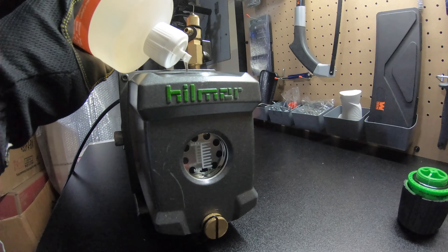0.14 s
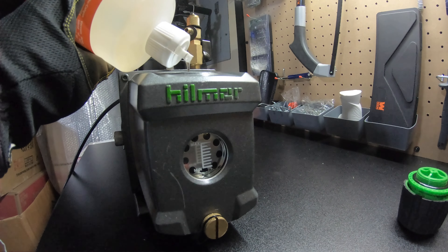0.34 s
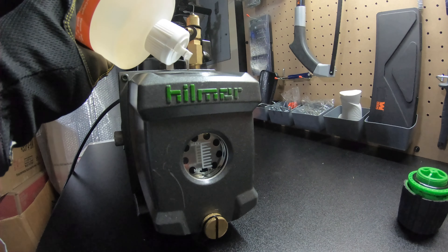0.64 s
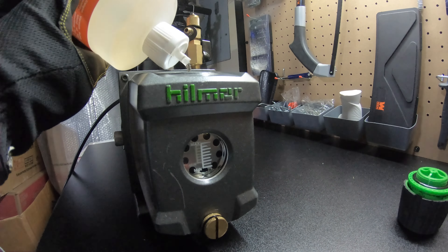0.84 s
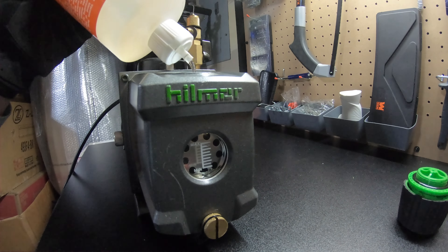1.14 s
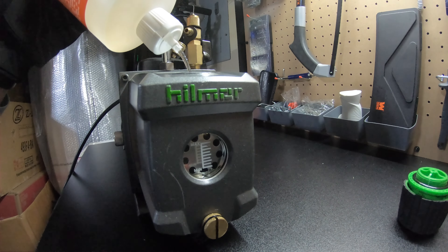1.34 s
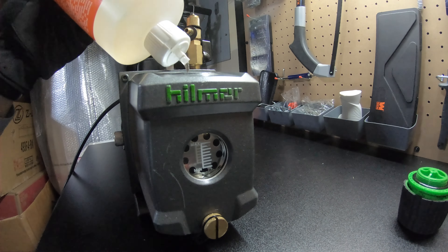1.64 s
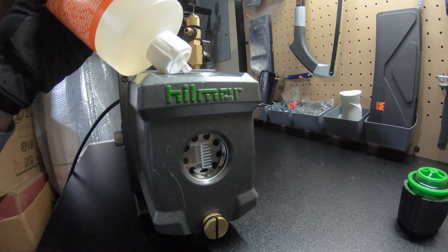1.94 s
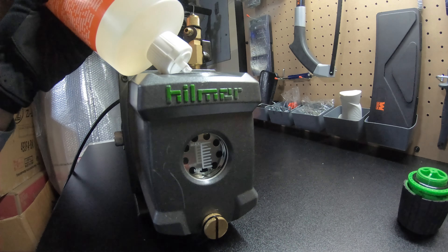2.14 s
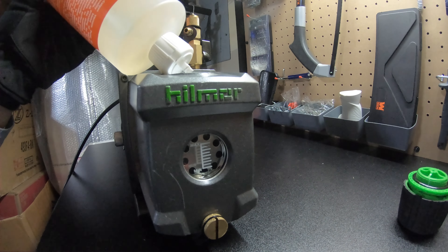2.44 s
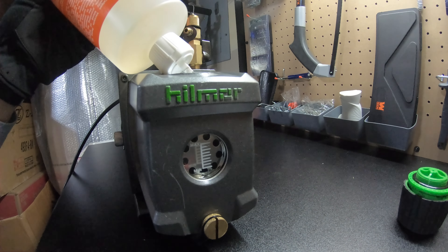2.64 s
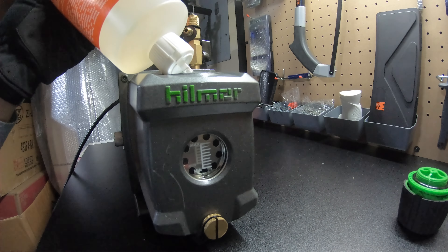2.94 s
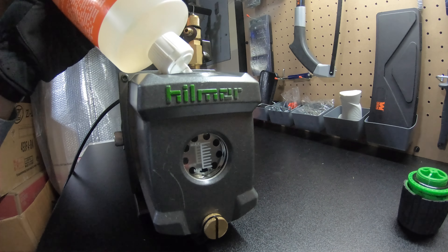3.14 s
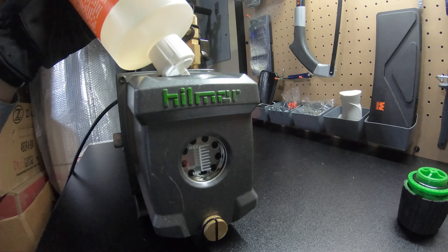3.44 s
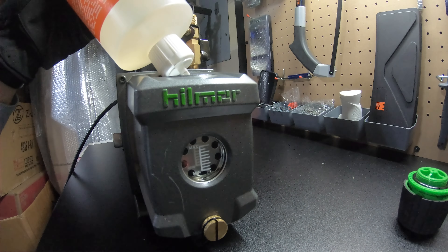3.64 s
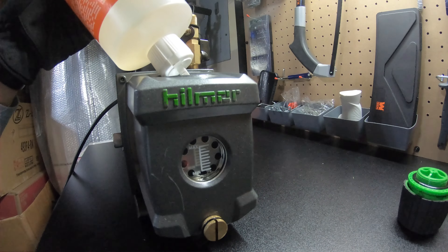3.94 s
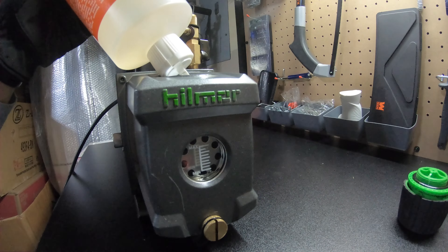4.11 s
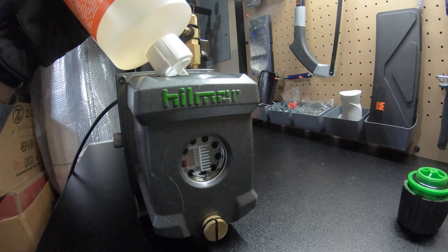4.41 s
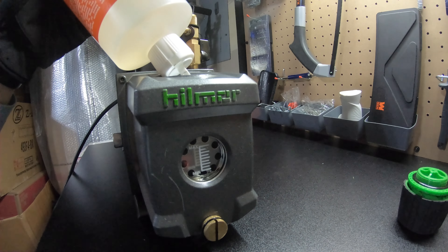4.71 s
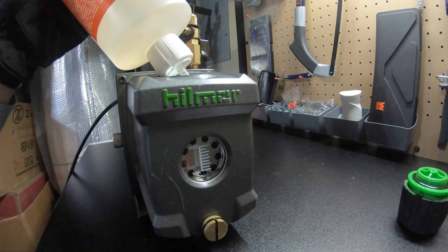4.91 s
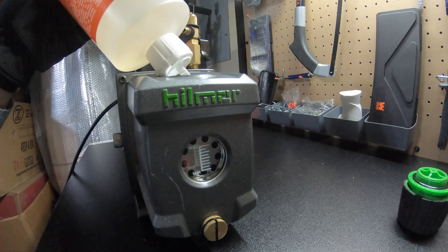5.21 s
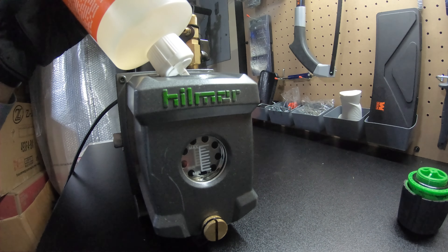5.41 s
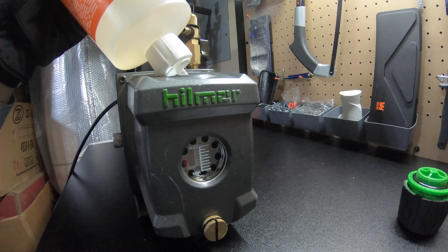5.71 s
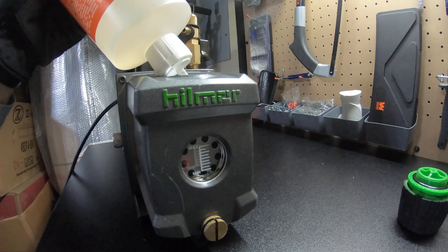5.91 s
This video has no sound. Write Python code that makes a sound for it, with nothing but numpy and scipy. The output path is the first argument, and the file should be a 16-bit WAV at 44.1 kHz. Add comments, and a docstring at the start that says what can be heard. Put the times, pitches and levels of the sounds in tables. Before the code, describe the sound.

For the first 0.7 seconds there is only low mains hum and room rumble, with a faint bright rustle fading by 0.2. At 0.7 the hum abruptly gives way to a steady, slightly buzzy electric whine, fairly low to middling in pitch, with unevenly flickering hiss. A tiny hiss at the spout leads to the loudest glug at 1.0: a deep, hollow double gulp with a plastic knock and a short reservoir ring. Another strong glug follows at 1.7. Smaller, crackling clusters come at 2.4, 3.25, 4.0, 4.6 and 5.15, with sharp little pops in several. Soft plops, faint burbles and slight bottle thumps sit between. A faint low tone sinks from 1.3 to 3.9; a thin, breathy whistle wavers and mostly sinks from 2.7 to 5.8. After the last glug, small burbles and whine continue to about 6. Close, wide stereo, a short dull workshop reflection.

```python
"""Oil glugs from a plastic bottle into a pump reservoir on a workbench, heard at two close ports.
About every 0.7 s air breaks in through the spout: trains of gulps ring damped modes of belly and neck.
The oil film crackles as shaped noise; pops, plops, thumps, a wall knock and the hollow are damped modes too.
Two faint tones mostly sink during the pour. Behind lies a mains hum, then a harmonic whine and filtered hiss."""
import sys
import numpy as np
from scipy import signal
from scipy.fft import rfft, irfft, next_fast_len
from scipy.io import wavfile
from scipy.ndimage import uniform_filter1d

SR = 44100
rng = np.random.default_rng(int(sys.argv[2]) if len(sys.argv) > 2 else 0)


def file_out(sig):
    """Save sig as 16-bit WAV at sys.argv[1]."""
    # one column per channel
    cols = np.atleast_2d(sig).T
    # limit, then scale
    lim = np.clip(cols, -1, 1)
    pcm = np.round(lim * 32767).astype(np.int16)
    wavfile.write(sys.argv[1], SR, pcm)


N = 267246
T = np.arange(N) / SR  # time axis, s

# whistle track, shared by its core and its hiss: start_s, pitch_hz, level_db
WHISTLE_TRACK = [(2.65, 2600, -85), (2.94, 2560, -65.5), (3.05, 2523, -80), (3.65, 2410, -67.5),
                 (4.15, 2338, -69), (4.26, 2376, -54), (4.35, 2360, -63), (4.46, 2370, -69),
                 (4.57, 2340, -56.5), (4.69, 2333, -68.5), (4.79, 2328, -58.5), (4.86, 2320, -68),
                 (4.93, 2310, -62.5), (5.1, 2323, -71), (5.22, 2330, -58.5), (5.37, 2310, -67.5),
                 (5.7, 2290, -68.5), (5.85, 2290, -83)]


def undb(db):
    """Amplitude ratio: 20 dB is a factor of ten."""
    return 10 ** (np.asarray(db) / 20)


def add(out, start_s, sound):
    """Superposition: mix a sound in at its start time."""
    i = max(int(start_s * SR), 0)
    n = min(sound.shape[-1], N - i)
    out[..., i:i + n] += sound[..., :n]


def walk(rate_hz):
    """Slow random modulation of unit deviation: held random levels smoothed by two moving averages."""
    hold = int(SR / rate_hz)
    steps = np.repeat(rng.standard_normal(N // hold + 1), hold)
    smooth = uniform_filter1d(uniform_filter1d(steps, hold), hold)[:N]
    return smooth / smooth.std()


def colour(x, hz, db):
    """Linear filtering by a magnitude response drawn on a log-frequency axis."""
    size = next_fast_len(N + 4096)
    f = np.maximum(np.fft.rfftfreq(size, 1 / SR), 1)
    response = undb(np.interp(np.log(f), np.log(hz), db))
    return irfft(rfft(x, size) * response, size)[..., :N]


def ports(z, pan_db, phase_rad):
    """Interport level and phase difference: an analytic sound reaches the nearer port in full."""
    left = undb(np.minimum(pan_db, 0)) * z.real
    right = undb(np.minimum(-pan_db, 0)) * (z * np.exp(1j * phase_rad)).real
    return np.array([left, right])


def ring(modes, hz, rise_s, length=1, glide=0, scatter=0.019):
    """Modal decay, peak 1: a soft push excites damped modes; a closing bubble's pitch glides up."""
    glide_s = 0.0059  # the glide passes through the main pitch at this age
    t = T[:SR // 4]
    ratio, db, t60 = np.transpose(modes)[:, :, None]
    f = hz * ratio * (1 + scatter * rng.standard_normal(ratio.shape))
    age = t / length  # a longer push stretches rise, glide and decay
    clock = np.cumsum(1 + glide * np.tanh(age / glide_s - 1)) / SR
    decay = undb(db - 60 * age / t60)
    z = np.sum(decay * np.exp(2j * np.pi * f * clock), axis=0)
    z = z * (1 - np.exp(-(age / rise_s) ** 2))
    return z / abs(z).max()


def bottle(low_cut_hz=60, neck_lead_s=0.0018):
    """Cavity resonance: each gulp or burble rings the air in belly and neck, the neck speaking first."""
    # modes of the air in the belly and in the neck: pitch_ratio, level_db, t60_s
    belly_modes = [(.33, -21, 0.095), (.64, -17.5, 0.059), (1, 5.5, 0.054), (1.24, -3, 0.039),
                   (1.42, -21.5, 0.014), (2.0, -10.5, 0.034)]
    neck_modes = [(.44, -18, .04), (.565, -9, .06), (.67, -20, 0.076), (.89, -9.5, 0.089), (1, 12.5, 0.023),
                  (1.045, -19.5, 0.034), (1.42, -16.5, 0.028)]
    # belly at the ports: left_minus_right_db, right_phase_rad
    belly_ports = (6.5, 2.37)
    # the neck sounds further right as the spout is lowered: start_s, left_minus_right_db
    neck_pan = [(1.1, -9), (1.7, -17), (2.4, -17.5)]
    # gulps of air, in trains during a glug and singly between:
    # start_s, belly_hz, belly_db, neck_hz, neck_db, relative_length
    gulps = [(0.918, 268, -42.5, 880, -35, 1.2), (0.936, 265, -33.5, 844, -38.5, 1.3),
             (0.999, 282, -21, 846, -11, 0.85), (1.004, 276, -10.5, 854, -18.5, 0.82),
             (1.014, 236, -27.5, 837, -36, 0.99), (1.02, 249, -34, 846, -18.5, 0.75),
             (1.028, 249, -34, 820, -28.5, 0.75), (1.073, 259, -41, 860, -36, 1.4),
             (1.091, 300, -46, 850, -52, 0.79), (1.106, 298, -31, 830, -34.5, 1),
             (1.454, 324, -37, 890, -56, 0.81), (1.475, 260, -44, 870, -64, 1),
             (1.582, 267, -50, 870, -55, 0.91), (1.709, 274.8, -15, 839, -12, 1.18),
             (1.714, 258, -28, 845, -15.5, 0.92), (1.722, 263, -20, 833, -24, 1.3),
             (1.741, 273, -32, 824, -21.5, 1.3), (1.76, 266.6, -44, 844, -23.5, 0.94),
             (1.772, 263, -30, 820, -35, 1.4), (1.784, 269, -26.5, 812, -22, 0.95),
             (1.841, 292, -35, 834, -23, 1), (1.939, 274, -45, 840, -41.5, 1.2),
             (2.238, 268, -44, 880, -66, 1), (2.271, 270, -39.5, 816, -53, 0.82),
             (2.404, 339, -23.5, 797, -32, 1.1), (2.412, 347, -29, 797, -27, 1),
             (2.423, 318, -24.5, 834, -36, 0.85), (2.43, 315, -38, 830, -29.5, .7),
             (2.451, 296, -30, 797, -31, 1.14), (2.467, 290, -44, 830, -43, .8),
             (2.472, 280, -36, 860, -50, 0.94), (2.481, 293, -35, 860, -52, 0.67),
             (2.882, 335, -48, 784, -42, 1), (3.147, 270, -42, 850, -58, 0.73),
             (3.246, 319, -22.5, 862, -26, 1.35), (3.259, 310, -35, 850, -41, 0.56),
             (3.268, 278, -21, 840, -39, 1), (3.278, 275, -20, 830, -32, .8),
             (3.297, 277, -33, 840, -40, 0.81), (3.304, 282, -53, 850, -40, 0.57),
             (3.321, 286, -26, 830, -40, 1.2), (3.379, 262, -39, 810, -51, 1),
             (3.988, 299, -27, 810, -26, .9), (3.995, 320, -23, 831, -16.5, 1.16),
             (4.007, 286, -25, 814, -21, 1.13), (4.018, 271, -21.5, 845, -36, 1.26),
             (4.038, 266, -24.5, 830, -35, 1.22), (4.071, 292, -49, 840, -56, 0.57),
             (4.155, 287, -36, 870, -50, 0.8), (4.175, 247, -47, 870, -55, 0.75),
             (4.283, 305, -39.5, 860, -58, 1.1), (4.495, 278, -42, 880, -63, 1.05),
             (4.587, 350, -22, 796, -25, 0.8), (4.594, 351, -25, 825, -20.5, 1.05),
             (4.599, 351, -26, 837, -36, 1.16), (4.61, 296, -24, 790, -32, 1.25),
             (4.628, 267, -28.5, 873, -35, 1), (4.644, 280, -27, 836, -35.5, .8),
             (4.672, 286, -36, 810, -47, 0.94), (4.716, 300, -41, 860, -60, 1.1),
             (4.74, 249, -45, 860, -63, 1.06), (4.766, 276.5, -40, 850, -58, 0.72),
             (4.79, 335, -44, 870, -47, 0.85), (4.962, 288, -43, 838, -65, 1.2),
             (5.036, 298, -29, 850, -34, 1.12), (5.157, 334, -23, 830, -24.5, 1.1),
             (5.162, 326, -38, 845, -20.5, 0.74), (5.171, 300, -27, 875, -28, 1.1),
             (5.182, 267, -25, 888, -27.5, 0.97), (5.19, 260, -37, 860, -45, 1.1),
             (5.198, 259, -38, 850, -35, 0.84), (5.222, 277, -27.5, 794, -38.5, 1.1),
             (5.244, 282, -36, 800, -61, 1.2), (5.295, 300, -38, 854, -58, 1),
             (5.366, 277, -38.5, 880, -66, 0.94), (5.59, 284, -37, 786, -36, 0.99),
             (5.716, 255, -45, 860, -71, 1.3)]
    belly, neck = np.zeros((2, N), complex)
    for start_s, belly_hz, belly_db, neck_hz, neck_db, length in list(gulps) + burbles():
        belly_ring = ring(belly_modes, belly_hz, rise_s=0.0029, length=length, glide=0.0064, scatter=0.014)
        neck_ring = ring(neck_modes, neck_hz, rise_s=0.0045, length=length, glide=0.033, scatter=0.017)
        add(belly, start_s, undb(belly_db) * belly_ring)
        add(neck, start_s - neck_lead_s, undb(neck_db) * neck_ring)
    neck_pan_db = np.interp(T, *np.transpose(neck_pan))
    sound = ports(belly, *belly_ports) + ports(neck, neck_pan_db, phase_rad=-1.61)
    return signal.sosfilt(signal.butter(2, low_cut_hz, "high", fs=SR, output="sos"), sound)


def burbles(db=-50, spread_db=5.5, neck_db=-54, start_s=1.2, belly_hz=270, neck_hz=830, count=90):
    """Random arrivals: small burbles of chance size and level, in the same columns as the gulps."""
    when = rng.uniform(start_s, N / SR, count)
    chance = rng.standard_normal((count, 3))
    return [(s, belly_hz * np.exp(0.3 * size), db + spread_db * a,
             neck_hz * np.exp(0.2 * size), neck_db + spread_db * b, 1)
            for s, (a, size, b) in zip(when, chance)]


def film(grain_db=4, tail_db=-24, tail_s=0.014):
    """Shot noise: the tearing oil film sprays tiny clicks, a mid spit and a bright fizz with short tails."""
    # tears as a glug opens, crackles and snaps shut: start_s, spit_db, fizz_db, decay_s
    tears = [(.998, -46.5, -62, 0.01), (1.706, -40.5, -61, 0.0069), (1.7385, -39, -45.5, 0.0037),
             (1.793, -45, -47, 0.0031), (2.4013, -35, -38.5, 0.0065), (2.412, -40, -61, .002),
             (2.423, -41, -44.5, 0.0041), (2.451, -51, -68, .004), (3.2429, -40, -37, 0.0074),
             (3.25, -35, -58, 0.01), (3.257, -39, -45, 0.0027), (3.2665, -50, -54, 0.0031),
             (3.279, -55, -60, 0.0048), (3.2957, -46.5, -70, .004), (3.317, -50, -70, 0.0059),
             (3.986, -37, -35.5, 0.0034), (3.9895, -34.5, -49, 0.0087), (4.0068, -46, -37, 0.0025),
             (4.016, -43, -65, 0.0036), (4.038, -48.5, -74, 0.0053), (4.585, -37.5, -37.5, 0.0073),
             (4.593, -34.5, -50, 0.004), (4.598, -40, -45.5, 0.0034), (4.607, -45, -61, .003),
             (4.617, -45.5, -55, 0.006), (4.639, -50, -74, .003), (4.888, -66, -61, 0.0021),
             (4.985, -55, -62, 0.0029), (5.154, -41, -37.5, 0.005), (5.1554, -36, -45, 0.01),
             (5.169, -34, -56, 0.0043), (5.177, -38, -37.5, 0.0013), (5.183, -54, -51, .002),
             (5.195, -40, -40, 0.0027), (5.223, -53, -75, 0.0052)]
    # relative spectra of spit and fizz: frequency_hz, level_db
    spit_colour = [(600, -11), (1300, 5), (2000, -5.5), (2900, -5), (3600, 0.5), (4400, -12.5),
                   (5200, -5.5), (7000, -21.5), (12000, -65)]
    fizz_colour = [(3000, -5.5), (6000, -11.5), (7600, 1), (8700, -4.5), (9800, 3.5), (11000, 3.5),
                   (12000, -1), (12600, -1), (13800, -6), (15500, -5), (17000, -19)]
    t = T[:SR // 6]
    power = np.zeros((2, N))
    for start_s, spit_db, fizz_db, decay_s in tears:
        decay = np.exp(-t / decay_s) + undb(tail_db) * np.exp(-t / tail_s)
        shape = decay * (1 - np.exp(-t / 0.00026))
        add(power, start_s, (undb([[spit_db], [fizz_db]]) * shape) ** 2)
    out = 0
    for part_power, spectrum, pan_db in zip(power, (spit_colour, fizz_colour), (-5, 4.5)):
        # noise partly common to both ports, its level redrawn every 24 samples
        grains = undb(grain_db * np.repeat(rng.standard_normal(N // 24 + 1), 24)[:N])
        clicks = (rng.standard_normal((2, N)) + 0.76 * rng.standard_normal(N)) * grains
        scale = 1 / colour(clicks, *np.transpose(spectrum)).std()
        crackle = scale * colour(clicks * np.sqrt(part_power), *np.transpose(spectrum))
        out = out + crackle * undb([[min(pan_db, 0)], [min(-pan_db, 0)]])
    return out


def pops():
    """Bubble resonance: tiny bubbles burst at the spout with short pitched ticks."""
    # bursts: start_s, pitch_hz, level_db, left_minus_right_db
    bursts = [(1.7437, 2620, -47, 0), (1.941, 3560, -51, 5), (2.429, 3520, -36.5, -5),
              (4.007, 12130, -24, 3), (4.5902, 3800, -27.5, -12), (4.62, 3430, -34, -6),
              (5.173, 4000, -37, -14)]
    # modes of a burst: pitch_ratio, level_db, t60_s
    pop_modes = [(.73, -7, 0.0017), (.89, -4, 0.0092), (1, 6, 0.014), (1.124, -7, .007), (1.25, -7, 0.0042)]
    out = np.zeros((2, N))
    for start_s, hz, db, pan_db in bursts:
        tick = undb(db) * ring(pop_modes, hz, rise_s=0.00032)
        add(out, start_s, ports(tick, pan_db, phase_rad=-1.37))
    return out


def seep(centre_s=0.92, width_s=0.021, db=-48.0):
    """Turbulence noise: air hisses past the spout just before the first glug."""
    hz = [300, 900, 2800, 3700, 4400, 7000, 10000, 16000]
    hiss = colour(rng.standard_normal((2, N)), hz, [-15, 9.0, -3.0, -1.5, -3.0, -7.0, -34.0, -5])
    return undb(db) * hiss / hiss.std() * np.exp(-((T - centre_s) / width_s) ** 2)


def wall():
    """Plate modes: the sucked-in plastic wall knocks as the first air relieves it."""
    # the wall flexing back: start_s, level_db
    flexes = [(0.998, -24.5), (1.007, -27), (1.016, -42)]
    # modes of the wall: pitch_ratio, level_db, t60_s
    wall_modes = [(.62, 9, 0.016), (.9, -7.5, 0.03), (1, -2.5, 0.061), (1.23, -3.5, 0.028), (1.38, -5, .02),
                  (1.88, -19, 0.019), (2.39, -15, 0.027)]
    z = np.zeros(N, complex)
    for start_s, db in flexes:
        add(z, start_s, undb(db) * ring(wall_modes, hz=1940, rise_s=0.00049))
    return ports(z, pan_db=-6.5, phase_rad=-1.24)


def thumps():
    """Low-mode vibration: the flexing, filled bottle thumps softly in two slow modes."""
    # thumps: start_s, level_db
    knocks = [(3.303, -46), (4.26, -51.5), (4.609, -46), (5.032, -43), (5.203, -44)]
    z = np.zeros(N, complex)
    for start_s, db in knocks:
        add(z, start_s, undb(db) * ring([(1, -0.78, 0.29), (1.6, -1.7, 0.22)], hz=92, rise_s=0.0039))
    return ports(z, pan_db=-10.5, phase_rad=0.41)


def plops():
    """Bubble closure: oil lands in the reservoir with soft, short, rising plops."""
    # landings: start_s, pitch_hz, level_db
    landings = [(.934, 599, -39), (1.452, 560, -42.5), (1.797, 547, -34), (1.845, 563, -39),
                (1.893, 531, -41.5), (2.48, 514, -43), (2.896, 540, -39), (3.592, 540, -45),
                (4.288, 603, -41), (4.393, 534, -46), (4.789, 487, -33), (5.035, 512, -40),
                (5.21, 528, -57), (5.286, 489, -40)]
    # modes of a plop: pitch_ratio, level_db, t60_s
    plop_modes = [(.65, -8.5, .03), (1, 2, .04), (1.3, -6, .025)]
    # plops at the ports: left_minus_right_db, right_phase_rad
    plop_ports = (-2, -2)
    z = np.zeros(N, complex)
    for start_s, hz, db in landings:
        add(z, start_s, undb(db) * ring(plop_modes, hz, rise_s=0.0013, glide=0.14))
    return ports(z, *plop_ports)


def hollow(hz=558.558, t60=0.19, rise_s=0.0085):
    """Cavity resonance: the reservoir's air rings on after strong glugs, roughened by the moving oil."""
    # excitations: start_s, level_db
    glugs = [(1.001, -16.5), (1.71, -31), (3.996, -37), (4.592, -35)]
    z = np.zeros(N, complex)
    for start_s, db in glugs:
        add(z, start_s, undb(db) * ring([(1, 0, t60)], hz, rise_s=rise_s, scatter=0))
    wobble = 1 + 0.22 * (walk(110) + 1j * walk(110))
    return ports(z * wobble, pan_db=-1.3, phase_rad=-2.44)


def workshop(x, wet_db=-15, t60=0.18):
    """Reverberation by convolution: bench and tool wall throw back a short, dull wash."""
    t = T[:SR // 3]
    echo = rng.standard_normal((2, len(t))) * undb(-60 * t / t60) * (t > 0.004)
    echo = echo / np.sqrt(np.sum(echo ** 2, axis=1, keepdims=True))
    echo = signal.lfilter(*signal.butter(1, 3000, fs=SR), echo)
    return x + undb(wet_db) * signal.fftconvolve(x, echo, axes=1)[:, :N]


def sinking_tone(track, flutter_db, width_hz, rough):
    """Narrow-band modulation: a gliding tone wavers at a rate that sets its bandwidth."""
    start_s, hz, db = np.transpose(track)
    waver = 1 + rough * (walk(width_hz) + 1j * walk(width_hz))
    waver = waver / np.sqrt(1 + 2 * rough ** 2)
    gain = undb(np.interp(T, start_s, db, left=-120, right=-120) + flutter_db * walk(14))
    turn = 2 * np.pi * np.cumsum(np.interp(T, start_s, hz)) / SR
    return gain * (waver * np.exp(1j * turn)).real


def low_tone():
    """Frequency glide: a faint low tone sinks while the oil runs."""
    # the tone's course: start_s, pitch_hz, level_db
    track = [(1.3, 615, -73), (1.58, 611, -56.5), (1.9, 605, -55), (2.2, 603, -70), (2.5, 598, -56.5),
             (2.75, 578.5, -61), (3.0, 545, -56.5), (3.1, 535, -63), (3.3, 533, -60.5), (3.7, 530, -53.5),
             (3.87, 515, -64)]
    return sinking_tone(track, flutter_db=2.5, width_hz=22, rough=0.3)


def whistle(hiss_db=-6):
    """Tone in noise: a thin, mostly sinking whistle is half buried in a band of hiss that swells with it."""
    core = sinking_tone(WHISTLE_TRACK, flutter_db=2.0, width_hz=40, rough=0.76)
    hiss = sinking_tone(WHISTLE_TRACK, flutter_db=2.5, width_hz=600, rough=5.5)
    return (core + undb(hiss_db) * hiss) / np.sqrt(1 + undb(hiss_db) ** 2)


def whine(pitch_hz=480.5, waver=0.00061, flutter_db=1.5, flutter_db_per_harmonic=0.13):
    """Harmonic series: a steady electric whine with strong odd harmonics; the higher ones flicker more."""
    # harmonics, rms levels: harmonic, left_db, right_db, right_phase_rad
    harmonics = [(1, -52, -49.5, -1.25), (2, -66, -66, -2.5), (3, -59.5, -63.5, -1.5), (4, -69.5, -73, -2),
                 (5, -76, -74.5, -0.2), (6, -86.5, -90.5, -2.7), (7, -81, -81, -1.1), (8, -89.5, -87, -1)]
    turn = 2 * np.pi * np.cumsum(pitch_hz * (1 + waver * walk(6))) / SR
    out = np.zeros((2, N))
    for k, left_db, right_db, phase_rad in harmonics:
        angle = round(k) * turn + rng.uniform(0, 2 * np.pi)
        gain = np.sqrt(2) * undb((flutter_db + flutter_db_per_harmonic * k) * walk(9.8))
        out += gain * np.array([undb(left_db) * np.cos(angle), undb(right_db) * np.cos(angle + phase_rad)])
    return out


def mains(flutter_db=0.5):
    """Additive synthesis: a few partials, slightly unsteady, form the low mains hum."""
    # partials, rms level at the nearer port: pitch_hz, level_db
    partials = [(59.8, -49), (179.4, -59), (299.5, -67.5), (419.5, -77)]
    z = np.zeros(N, complex)
    for hz, db in partials:
        gain = np.sqrt(2) * undb(db + flutter_db * walk(6))
        z += gain * np.exp(2j * np.pi * (hz * T + rng.random()))
    return ports(z, pan_db=-2, phase_rad=1.12)


def background(table, db, flicker_db):
    """Mid-side decomposition: coloured noise in a common part and an opposed part at the ports."""
    hz, mid_db, side_db = np.transpose(table)
    mid, side = (colour(rng.standard_normal(N), hz, spectrum_db) * undb(flicker_db * walk(18))
                 for spectrum_db in (mid_db, side_db))
    return undb(db) * np.sqrt(SR / 2) * np.array([mid + side, mid - side])


def rumble():
    """Broadband noise: the room noise under the hum, almost steady."""
    # density before the overall gain: frequency_hz, mid_db_per_hz, side_db_per_hz
    spectrum = [(25.4, -80, -89.5), (57.6, -73, -71.5), (113, -79.5, -79), (196, -80, -79),
                (397, -97, -90.5), (725, -100, -88), (2030, -106, -102), (4040, -114, -118),
                (6400, -112, -113), (10700, -118, -119), (18200, -146, -146)]
    return background(spectrum, db=-0.5, flicker_db=0.04)


def air():
    """Broadband noise: the hiss and lows under the whine, flickering gently."""
    # density before the overall gain: frequency_hz, mid_db_per_hz, side_db_per_hz
    spectrum = [(30, -104, -106), (61.5, -104, -102), (92, -87, -96.5), (101, -91.5, -99.5),
                (300, -90.5, -94), (403, -84.5, -88), (573, -88, -92), (1000, -95.5, -96.5),
                (1316, -90.5, -90.5), (1925, -99, -97), (2840, -106, -99), (3900, -113, -106),
                (6250, -116, -100), (7170, -140, -108), (11600, -127, -116)]
    return background(spectrum, db=2.5, flicker_db=1.22)


def churn(x, below_hz=380):
    """Band-limited amplitude modulation: the lows of the background swell and drop unevenly."""
    lows = signal.sosfiltfilt(signal.butter(3, below_hz, fs=SR, output="sos"), x)
    swell = undb(3 * walk(32) - 1.5)
    return x + lows * (swell - 1)


def rustle(db=-68, end_s=0.18, fade_s=0.03):
    """Shaped noise: a faint, bright hiss at the start soon dies away."""
    hiss = colour(rng.standard_normal((2, N)), [800, 2500, 7000, 10000, 15000], [1, 4, 0, -24, -20])
    return undb(db) * hiss / hiss.std() * (1 - np.tanh((T - end_s) / fade_s)) / 2


def scene(whine_start_s=0.708):
    """Superposition: the pour and its tones over a hum that gives way to the whine."""
    pour = workshop(bottle() + plops() + thumps() + hollow() + wall() + film() + pops() + seep())
    tones = low_tone() + whistle()
    late = np.clip((T - whine_start_s) / 0.0036 + 0.5, 0, 1)  # 3.6 ms crossfade
    early_bed = mains() + rumble() + rustle()
    late_bed = whine() + churn(air())
    return pour + tones + (1 - late) * early_bed + late * late_bed


def gain_control(x, threshold_db=-39, slope=0.09, lag_s=0.08, release_s=0.029):
    """Lagged compression: smoothed power lowers the gain, so the level dips just after a loud glug."""
    keep = np.exp(-1 / (release_s * SR))
    power = signal.lfilter([1 - keep], [1, -keep], np.mean(x ** 2, axis=0))
    late_power = np.interp(T - lag_s, T, uniform_filter1d(power, size=1024))
    return x * (1 + late_power / undb(threshold_db) ** 2) ** -slope


def record(dry, top_hz=16100):
    """Compression and band limiting: the gain control, then a steep low-pass that cuts the top."""
    return signal.sosfilt(signal.ellip(8, 0.2, 70, top_hz, fs=SR, output="sos"), gain_control(dry))


dry = scene()
out = record(dry)
file_out(out)
```